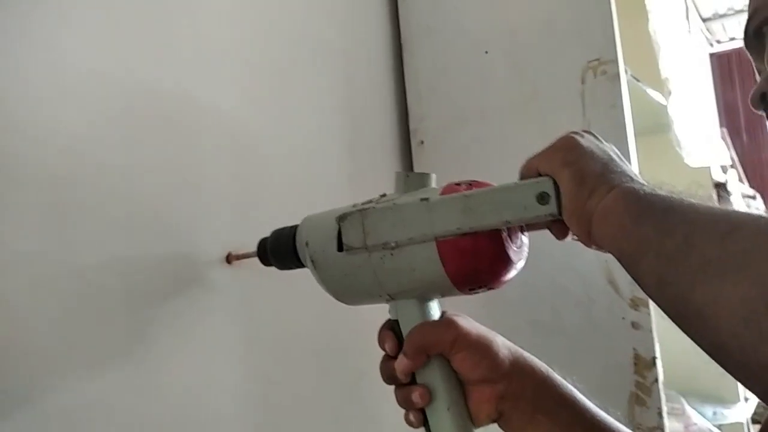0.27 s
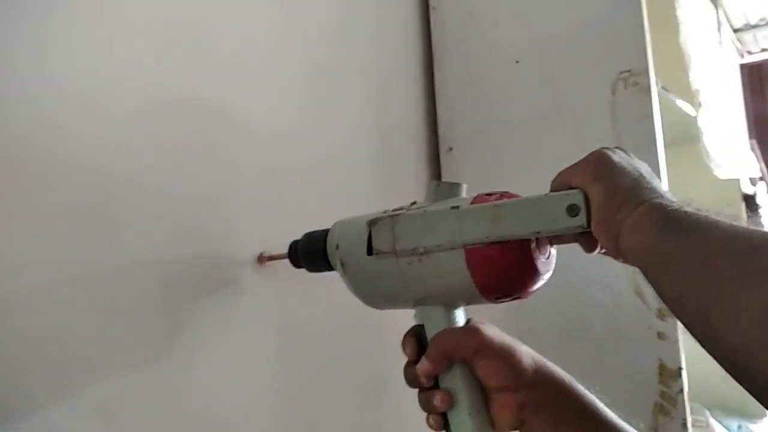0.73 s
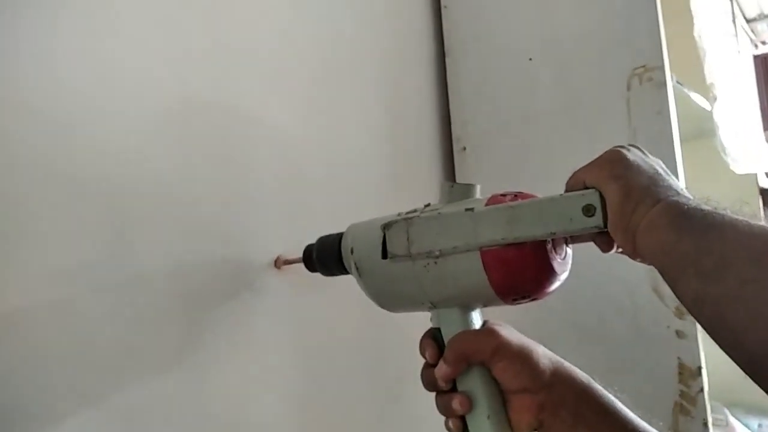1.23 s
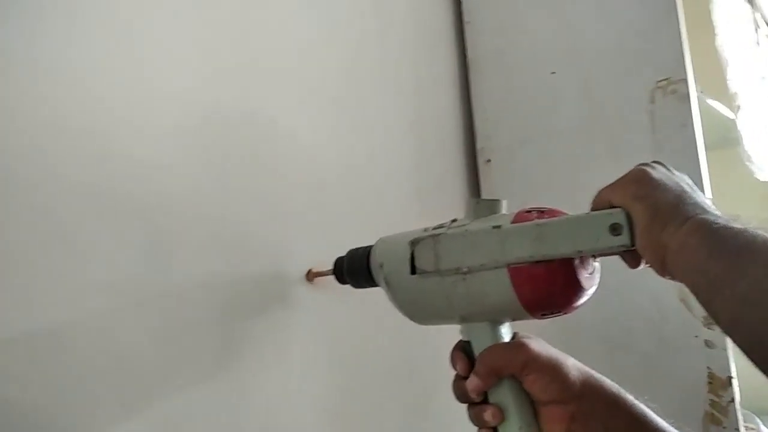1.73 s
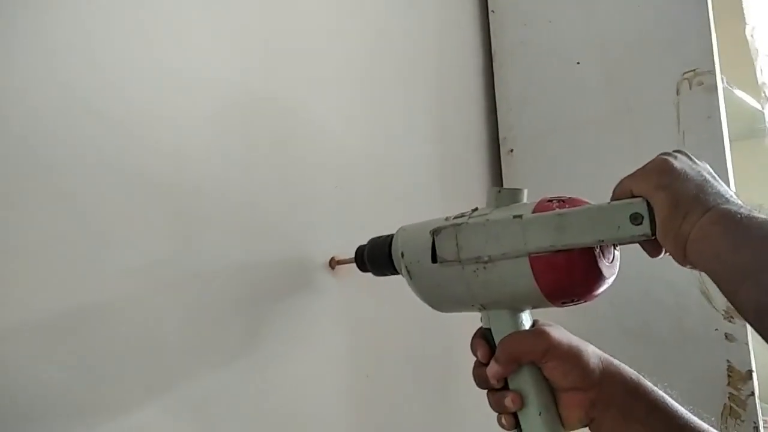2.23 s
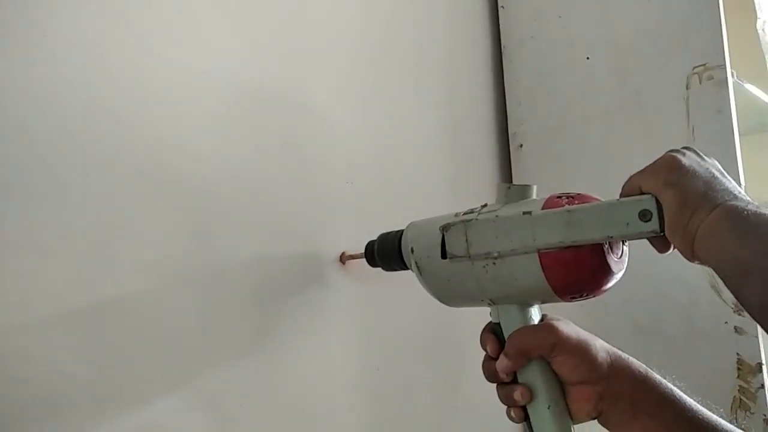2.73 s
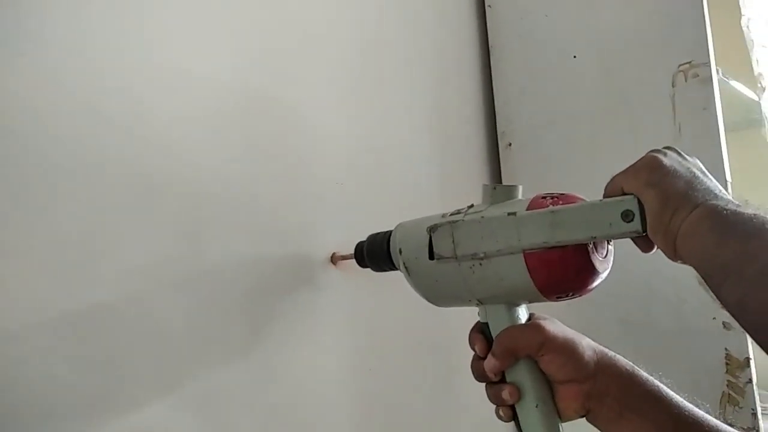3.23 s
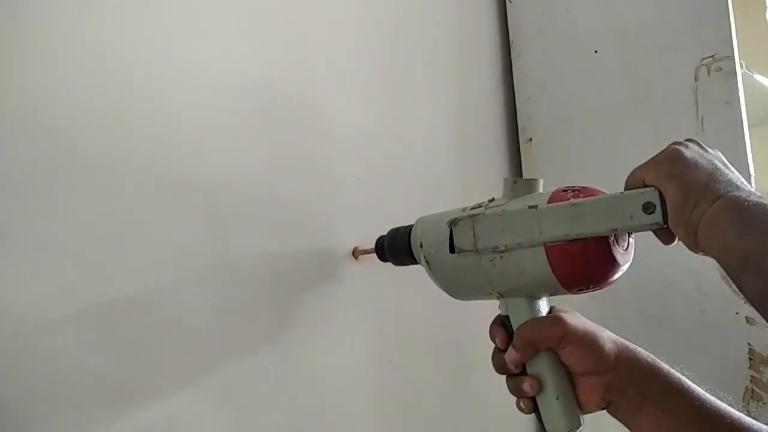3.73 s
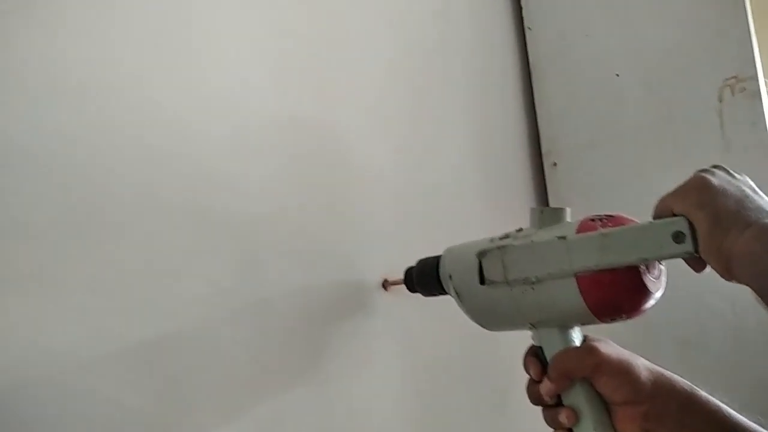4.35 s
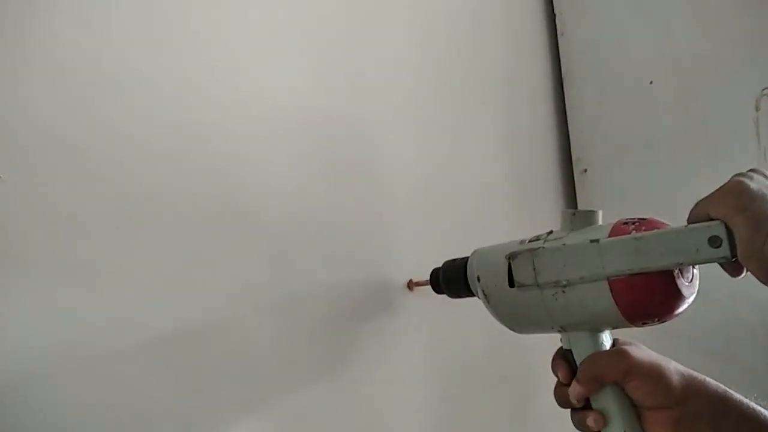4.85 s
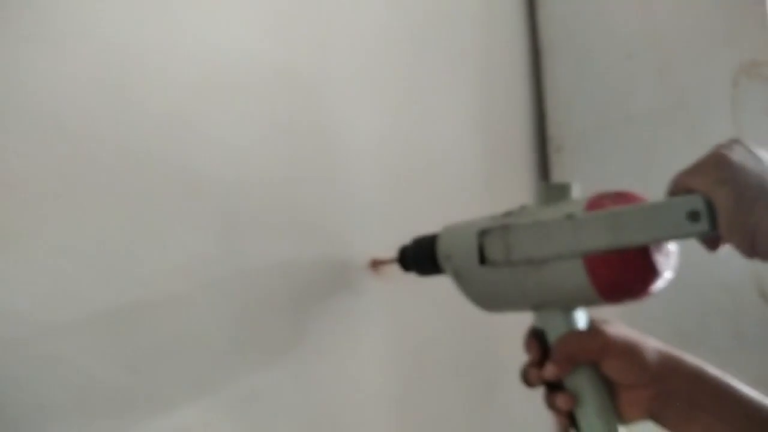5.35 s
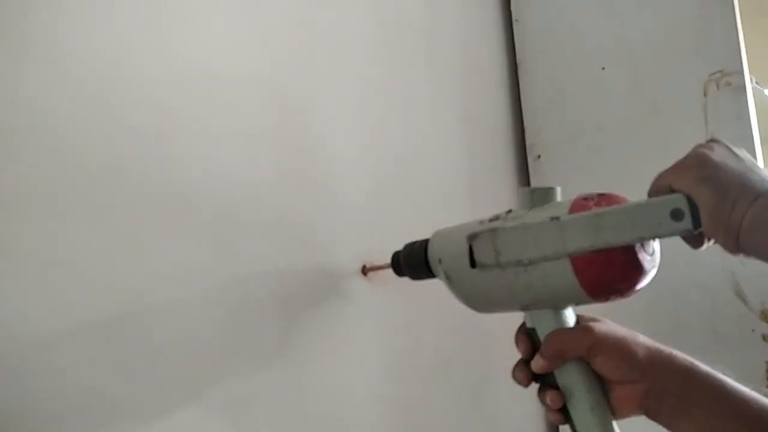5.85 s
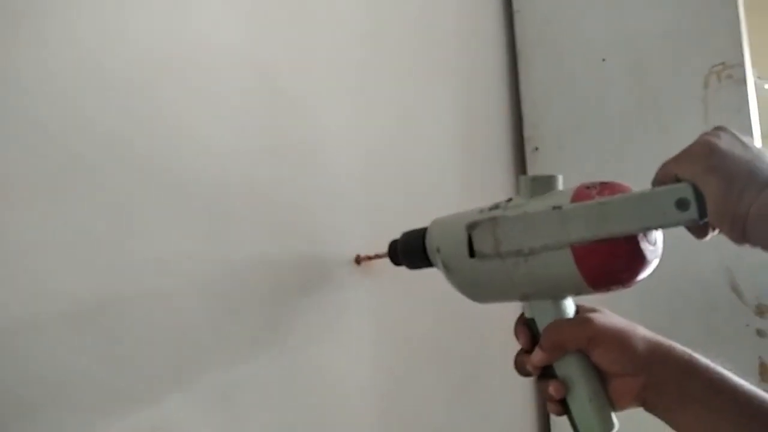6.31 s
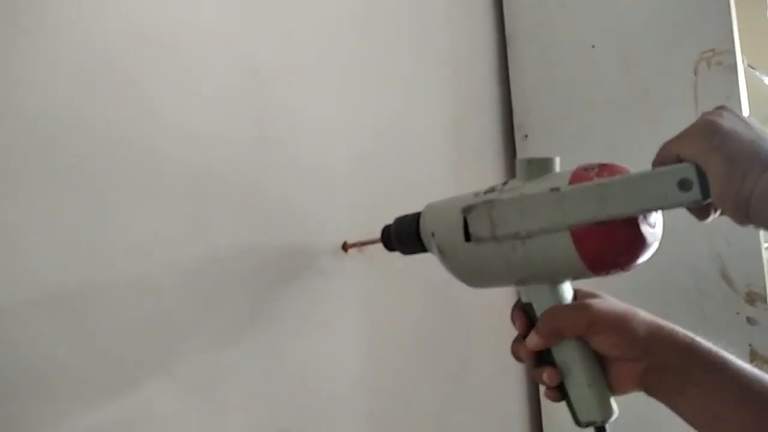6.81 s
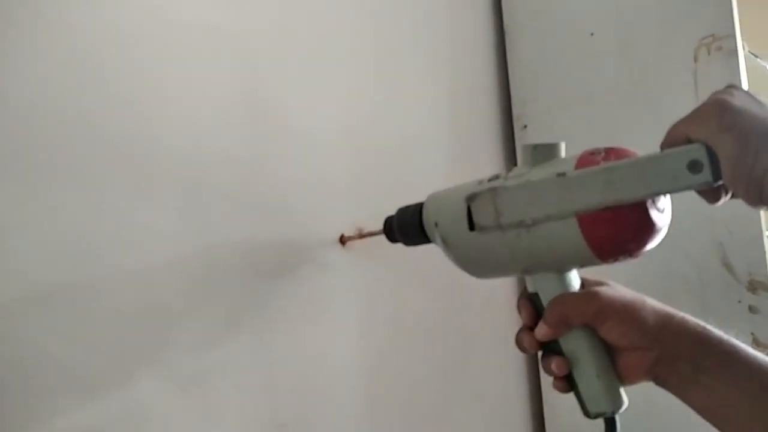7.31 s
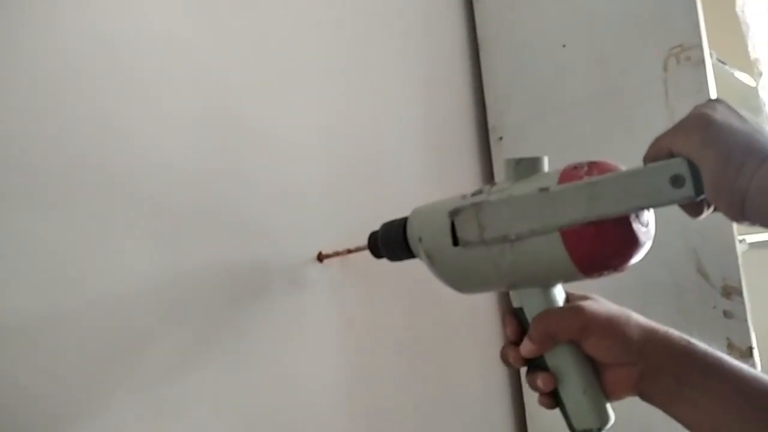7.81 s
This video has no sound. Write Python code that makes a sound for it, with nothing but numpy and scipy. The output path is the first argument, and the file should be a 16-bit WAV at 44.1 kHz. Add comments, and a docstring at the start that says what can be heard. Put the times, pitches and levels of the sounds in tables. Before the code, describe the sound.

A corded electric drill bores into a masonry wall, close to the microphone in a bare room. Its motor and gears whine steadily over a rush of air, while the bit gives rapid, high squeaks and a few soft low thumps sound on the left. After about five seconds the motor winds down, picks up briefly, and sinks again as the bit breaks into a shrill, wavering squeal.

```python
"""A corded drill bores into a masonry wall indoors, close to a two-port microphone. Motor and gears
whine through the housing; the trigger is let go at 5 s, so the rotor coasts down, and pulsed once more.
The bit sticks and slips on the stone: it squeaks about once a turn and squeals as it slows.
Low thumps reach mainly the left port, and the bare room answers."""
import sys
import numpy as np
from scipy import signal
from scipy.fft import rfft, irfft, next_fast_len
from scipy.io import wavfile
from scipy.ndimage import uniform_filter1d, map_coordinates

SR = 44100
rng = np.random.default_rng(int(sys.argv[2]) if len(sys.argv) > 2 else 0)


def master_out(mix):
    """Clip the mix to full scale and print it as 16-bit PCM to the path in sys.argv[1]."""
    frames = np.transpose(np.atleast_2d(mix))
    ceiling = np.clip(frames, -1, 1)
    pcm = np.round(ceiling * 32767).astype(np.int16)
    wavfile.write(sys.argv[1], SR, pcm)


N = 356151

# Rotor speed: t/s, f/Hz (turns a second)
ROTOR_SPEED = [(0, 326.5), (.35, 327.8), (1.2, 323.2), (1.6, 323), (2.3, 324.2), (3.35, 320), (3.8, 320.5),
               (5.03, 326), (5.34, 295), (5.8, 254.5), (6.27, 219.7), (6.78, 177), (6.86, 208), (6.95, 232),
               (7.2, 216), (7.66, 188), (8.08, 166)]
# Band faders of the motor: t/s, then level/dB of hum, drone, gears, hiss, top
MOTOR_BANDS = [(0, -43, -29.5, -15, -15.5, -30.5), (1.2, -43, -31, -16, -16.5, -32.5),
               (2.4, -43.5, -31, -17.5, -17, -32.5), (3.6, -44, -31, -16.5, -17.5, -34),
               (5, -44.5, -31, -16, -17, -32), (6.05, -44.5, -30, -16.5, -16, -31),
               (6.6, -49, -34, -20, -20, -31), (7.2, -46, -31.5, -17, -17.5, -33.5),
               (8.08, -47, -30.5, -21, -17.5, -29.5)]
GEAR_RATIO, CHUCK_RATIO = 5, 20  # rotor turns per turn of the gear shaft, of the chuck
def motor():
    """Air and gear noise throbs with the three shafts and sounds, with their tones, through the housing."""
    speed, = curves(ROTOR_SPEED)
    angle = 2 * np.pi * np.cumsum(speed) / SR
    throb = 1 + .076 * np.cos(angle) + .061 * np.cos(angle / GEAR_RATIO)
    throb += .062 * np.cos(angle / CHUCK_RATIO)
    source = throb * motor_rush() + motor_whine(speed, angle)
    out, edges_hz = 0, [0, 620, 1750, 5000, 11000, SR]
    for db, lo, hi in zip(curves(MOTOR_BANDS), edges_hz, edges_hz[1:]):
        band = filtered(source, lambda hz: housing(hz) * (hz >= lo) * (hz < hi))
        out += amp(db + .6 * wobble(9)) * unit(band)
    return out


# Gear tones: harmonic number of the gear shaft
GEAR_HARMONICS = [15, 34, 45, 51, 55, 56, 60, 61, 65, 83, 84, 85, 90, 94, 95, 115, 120, 144]
# Their balance at full load: level/dB
GEAR_LEVELS = [-20.5, -41, -25, -26, -40, -23.5, -26, -24, -26.5, -32, -22.5, -21, -23.5, -48, -20, -42,
               -24, -35]
# How hard the drill works: t/s, gear load/0-1, fan whine level/dB
LOAD_AND_FAN = [(0, 0.78, -20.5), (.75, 0.7, -15.5), (1.3, 0.76, -23), (3.35, 0.58, -22.5), (4.1, 0.6, -21),
                (5.03, 0.5, -28), (5.25, 0, -19.5), (5.5, 0.3, -18), (5.95, 0, -18.5), (6.3, 0.25, -27),
                (7.05, 0.35, -22), (8.08, 0.03, -33)]
def motor_whine(speed, angle):
    """Rotor, fan and gear teeth sing at harmonics of the gear shaft; the gear tones follow the load."""
    load, fan_db = curves(LOAD_AND_FAN)
    pace = speed / speed[0]
    spin_up = np.clip(uniform_filter1d(np.gradient(speed) * SR, size=3000) / 300, 0, 1)
    tones = [(5, amp(-15) * pace ** .66),  # rotor unbalance
             (50, amp(fan_db + 2.6 * wobble(6))),  # ten fan blades
             *[(harmonic, amp(db) * load) for harmonic, db in zip(GEAR_HARMONICS, GEAR_LEVELS)],
             (60, amp(-4 + 5.4 * wobble(250)) * spin_up * pace ** 3),  # twelve armature slots howl
             (90, amp(-17.5) * (1 - load) * (1 - speed / speed.max()))]  # shows as the rotor slows
    out = np.zeros((2, N))
    for harmonic, strength in tones:
        shared_phase = harmonic * angle / GEAR_RATIO + rng.uniform(0, 2 * np.pi) + .3 * wobble(20)
        for port in out:
            phase = shared_phase + .7 * wobble(1.5)
            port += np.sqrt(2) * strength * amp(1.5 * wobble(8)) * np.sin(phase)
    return out


# Focus of the rush: f/Hz, direct gain/0-1
DIRECT_SHARE = [(300, 0.54), (700, 0.85), (1500, 0.42), (3000, 0.62), (12000, 0.37)]
def motor_rush():
    """Air and gear noise arrives partly direct, partly as a diffuse wash."""
    near, far = patchy_noise(depth_db=2)[0], patchy_noise(depth_db=4)
    pair = np.array([near, np.roll(near, shift=4)])  # the left port is a little nearer
    direct = filtered(pair, lambda hz: along(DIRECT_SHARE, hz))
    wash = .71 * unit(room(near)) + .77 * far
    diffuse = filtered(wash, lambda hz: np.sqrt(1 - along(DIRECT_SHARE, hz) ** 2))
    return unit(direct + diffuse)


# Housing resonances: f/Hz, width/Hz, left level/dB, right level/dB
HOUSING_PEAKS = [(812, 140, 3.5, 5), (1480, 200, 7.5, 1.5), (2480, 58, 1.5, 3), (2760, 440, -2, -2.5),
                 (3340, 1040, 3, 2), (4617, 116, 7.5, 7), (5840, 220, 2.5, 4), (7530, 150, 7, 3.5),
                 (7910, 180, 5, -2)]
# Broad EQ of housing and microphone: f/Hz, left level/dB, right level/dB
PORT_EQ = [(60, -46, -37), (353, -23.5, -30.5), (760, -15, -10), (1645, -14, -9.5), (2127, -2, -3),
           (4616, -2, -1), (5020, -6.5, -16.5), (5620, -1.5, -8), (7530, -1, -1.5), (9520, -7, -8),
           (10700, -5.5, -14), (10850, -12, -10), (11840, 1.5, -1), (14240, -3, -5.5), (14400, -52, -54)]
def housing(hz):
    """Gain at both ports: the housing's resonances ride on broad slopes."""
    peaks = sum(np.array([[left_db], [right_db]]) / (1 + (2 * (hz - centre) / width) ** 2)
                for centre, width, left_db, right_db in HOUSING_PEAKS)
    slopes = np.array([along(np.array(PORT_EQ)[:, [0, side]], hz) for side in (1, 2)])
    return amp(slopes + peaks)


def bit_friction():
    """The bit sticks and slips on the stone; squeaks and squeal share a fast shake in pitch and level."""
    tremor_hz = 110 * wobble(700)
    flutter_db = np.clip(2 * wobble(300), -5, 3)
    return squeaks(tremor_hz, flutter_db) + squeal(tremor_hz, flutter_db)


def squeaks(tremor_hz, flutter_db):
    """Short chirps whose pitch bends as the tip binds and frees within a turn."""
    out, fade_s = np.zeros(N), .003
    for s, length, first_hz, middle_hz, last_hz, db in [*main_squeaks(), *faint_squeaks()]:
        u = np.linspace(0, 1, round((length + fade_s) * SR))
        start = round((s - fade_s / 2) * SR)
        here = slice(start, start + len(u))
        hz = first_hz * (1 - u) * (1 - 2 * u) + 4 * middle_hz * u * (1 - u) + last_hz * u * (2 * u - 1)
        phase = 2 * np.pi * np.cumsum(hz + tremor_hz[here]) / SR
        tone = np.sin(phase) + amp(-39) * np.sin(2 * phase)
        swell = np.clip(np.minimum(u, 1 - u) * length / fade_s, 0, 1)
        out[here] += amp(db + 3 + flutter_db[here]) * swell * tone
    return out


# Squeak cues, mostly one a chuck turn: t/s, f/Hz, level/dB
SQUEAK_CUES = [(.403, 6850, -21), (0.497, 6720, -17.5), (.568, 6800, -25), (.62, 6830, -19),
               (.686, 6980, -19), (.743, 7100, -18), (.87, 6720, -22), (.931, 6720, -16.5),
               (1.0, 7080, -17.5), (1.263, 7850, -21), (1.359, 6800, -17), (1.423, 6880, -15),
               (1.457, 8110, -20.5), (1.547, 6990, -19.5), (1.603, 6830, -17), (1.662, 6800, -16),
               (1.725, 6800, -18), (1.8, 7230, -22), (1.862, 7490, -21), (2.102, 6800, -21),
               (2.196, 8750, -24), (2.255, 8300, -22), (2.305, 7750, -19), (2.36, 7500, -19),
               (2.379, 8000, -17), (2.423, 7520, -16.5), (2.482, 7700, -15), (2.561, 8180, -16),
               (2.603, 7800, -16), (2.663, 7940, -12), (2.728, 8030, -14), (2.791, 7900, -13.5),
               (2.821, 8550, -19), (2.879, 8670, -21), (2.918, 7930, -14), (2.981, 7960, -13),
               (3.048, 7900, -14), (3.106, 7920, -14), (3.17, 7840, -14.5), (3.236, 8220, -15.5),
               (3.294, 7880, -15.5), (3.356, 7830, -16), (3.419, 7760, -14), (3.48, 7770, -13),
               (3.548, 7570, -13.5), (3.613, 7620, -14.5), (3.673, 7750, -15.5), (3.733, 7680, -12.5),
               (3.802, 7800, -18.5), (3.869, 7760, -18), (3.93, 7390, -21), (3.993, 7440, -18.5),
               (4.049, 7400, -17.5), (4.108, 7560, -17), (4.172, 7700, -15), (4.238, 7670, -17),
               (4.297, 7250, -16.5), (4.42, 7470, -18), (4.484, 7430, -18), (4.612, 7350, -19.5),
               (4.659, 4530, -16), (4.679, 4670, -17.5), (4.735, 7130, -17.5), (4.796, 7400, -14.5),
               (4.859, 7820, -16), (4.923, 7570, -15), (5.063, 4400, -21), (5.092, 4400, -18),
               (5.16, 4300, -18), (5.251, 4450, -20), (5.316, 4450, -18), (5.365, 8200, -21),
               (5.405, 4480, -21), (5.47, 4930, -19), (5.935, 4540, -21), (5.957, 4500, -20),
               (6.012, 4500, -23), (6.1, 4500, -21), (6.12, 3860, -20.5), (6.187, 4620, -24),
               (6.204, 4330, -23)]
# Squeak shape as the hole deepens: t/s, length/s, glide/Hz, sag in the middle/Hz
SQUEAK_SHAPE = [(0.505, 0.028, 150, 52), (1.4, 0.013, 0, 0), (1.7, 0.027, 450, 0), (2.295, 0.024, 379, 80),
                (2.695, 0.03, -200, 323), (2.903, 0.019, -600, 50), (3.6, 0.018, -500, 0),
                (4.202, 0.0226, -350, 32), (4.65, 0.017, 0, 0), (4.9, 0.012, -350, 80),
                (5.3, 0.013, 205, 0), (5.403, .025, -800, 0), (5.47, .018, 400, -3), (5.947, 0.016, 0, 0),
                (6.094, .022, -600, 0), (6.197, .02, 300, 0)]
def main_squeaks():
    """Each squeak takes its length and bend from the state of the tip at that moment."""
    s, hz, db = np.transpose(SQUEAK_CUES)
    when, *columns = np.transpose(SQUEAK_SHAPE)
    length, glide, sag = [np.interp(s, when, column) for column in columns]
    scatter_hz = 122 * rng.standard_normal((len(s), 2))
    first_hz = hz + sag - glide / 2 + scatter_hz[:, 0]
    last_hz = hz + sag + glide / 2 + scatter_hz[:, 1]
    return zip(s, length, first_hz, hz, last_hz, db)


# Runs of faint squeaks: start t/s, end t/s, squeak length/s, first, middle and last f/Hz, level/dB
SQUEAK_RUNS = [(0.875, .96, 0.023, 3440, 3580, 3760, -21), (1.308, 1.5, 0.015, 3390, 3594, 3690, -19),
               (1.758, 2.03, 0.013, 8560, 8580, 8800, -20.5), (5.312, 5.46, 0.022, 7660, 8340, 8450, -25),
               (5.538, 5.86, 0.017, 9740, 9600, 9400, -22.5), (6.1, 6.22, 0.018, 9500, 9260, 8750, -28)]
def faint_squeaks():
    """Within a run the bit squeaks once per chuck turn, each time a little differently."""
    turns = np.cumsum(curves(ROTOR_SPEED)[0]) / CHUCK_RATIO / SR
    t = np.arange(N) / SR
    for start, end, length, *hz, db in SQUEAK_RUNS:
        spread = np.ptp(hz) / np.mean(hz) / 3 + .005  # wide glides vary the most
        first, last = np.interp([start, end], t, turns)
        for s in np.interp(np.arange(first, last), turns, t):
            pitches = np.array(hz) * (1 + spread * rng.standard_normal(3))
            yield s, length, *pitches, db + 1.5 * rng.standard_normal()


# Long squeal of the slowing bit: t/s, f/Hz, level/dB
SQUEAL_LINE = [(5.55, 6000, -47), (5.575, 6200, -22.5), (5.9, 6180, -25), (5.93, 6200, -45),
               (6.24, 5900, -45), (6.28, 5600, -20), (6.31, 5840, -27), (6.33, 6950, -23),
               (6.36, 6450, -23), (6.41, 6340, -22), (6.43, 6780, -21), (6.53, 7030, -17.5),
               (6.62, 7100, -10), (6.65, 6780, -19), (6.68, 6970, -17.5), (6.74, 6350, -23.5),
               (6.78, 6800, -15), (6.83, 6040, -17.5), (6.89, 6300, -21), (7.0, 6020, -16.5),
               (7.13, 6160, -16.5), (7.26, 6550, -18), (7.35, 6400, -18), (7.45, 6320, -18.5),
               (7.5, 5930, -17), (7.545, 6320, -16), (7.575, 5970, -47)]
# A cutting edge catches, about twice a chuck turn: t/s, pitch drop/Hz, level drop/dB
EDGE_CATCHES = [(5.565, 1700, 0), (5.612, 0, 15), (5.638, 1500.5, 3), (5.69, 1, 15), (5.715, 701, -1),
                (5.808, 1699, 3), (5.88, 1898, 2), (6.315, -2, 12), (6.415, -1, 4), (6.5, 506, 5),
                (6.555, 200, 26), (6.599, 300, 24), (6.642, 302, 9), (6.702, 1187, 4), (6.762, 300, 6),
                (6.805, 795, 10), (6.9, 693, -1), (6.945, 1008, 9), (6.99, 1102, 5), (7.022, 1400, 10),
                (7.077, 554, 2), (7.105, 1610, 19), (7.152, 498, 4), (7.195, 898, 15), (7.237, 798, 1),
                (7.285, 996, 20), (7.33, 1038, -1), (7.38, 1340, 11), (7.422, 1105, 15), (7.478, 1210, 22),
                (7.52, 806, 18)]
def squeal(tremor_hz, flutter_db):
    """An unbroken stick-slip tone that sinks and ducks where an edge catches."""
    t = np.arange(N) / SR
    hz, db = curves(SQUEAL_LINE)
    for s, drop_hz, drop_db in EDGE_CATCHES:
        dip = np.clip(1 - abs(t - s) / .018, 0, 1) ** .93  # 18 ms down, 18 ms back
        hz, db = hz - drop_hz * dip, db - drop_db * dip
    phase = 2 * np.pi * np.cumsum(hz + tremor_hz) / SR
    tone = np.sin(phase) + amp(-22) * np.sin(2 * phase)
    gate = (t > SQUEAL_LINE[0][0]) & (t < SQUEAL_LINE[-1][0])
    return gate * amp(db + 1.5 + 2 * wobble(40) + flutter_db) * tone


# Pan of the direct bit sound: t/s, left minus right level/dB
BIT_PAN = [(6.4, 1.5), (6.8, 9)]
def bit_in_room(friction):
    """The bit is heard direct, leaning left, and back from the walls."""
    pan_db, = curves(BIT_PAN)
    return friction * amp([pan_db / 2, -pan_db / 2]) + amp(-3) * room(friction)


# Thump cues: t/s, level/dB
THUMP_CUES = [(1.86, -28), (2.364, -24), (2.675, -13), (2.797, -19), (3.176, -25), (3.48, -13),
              (4.045, -16), (4.799, -18.5), (6.46, -17), (6.571, -15), (6.659, -19)]
# Low flutter: t/s, bed level/dB, level/dB of the part that follows the bit
RUMBLE_LEVELS = [(0, -35, -15), (2.1, -36, -19), (2.5, -35, -11), (4.8, -36, -12.5), (5.3, -39, -25),
                 (6.5, -51, -21), (7.4, -54, -15.5), (7.7, -45, -18)]
# EQ of flutter and thumps: f/Hz, level/dB
RUMBLE_EQ = [(20, -35), (60, -12.5), (120, -5), (350, -1.5), (700, -10), (1100, -12)]
def thumps(friction):
    """Low noise swells whenever the bit binds and jolts at each cue, nearly all at the left port."""
    bed_db, bind_db = curves(RUMBLE_LEVELS)
    binding = np.sqrt(abs(uniform_filter1d(friction ** 2, size=400)))
    gain = amp(bed_db + 5.7 * wobble(30)) + amp(bind_db + 2.2 * wobble(40)) * binding
    t = np.arange(N) / SR
    for s, db in THUMP_CUES:
        u = np.clip(t - s, 0, None) / .0085  # peaks after 8.5 ms
        gain += amp(db - 6) * u ** 2 * np.exp(2 - 2 * u)
    rumble = filtered(rng.standard_normal((2, N)), lambda hz: amp(along(RUMBLE_EQ, hz)))
    return gain * unit(rumble) * amp([[0], [-17]])


# Reverb of the bare room: f/Hz, 60 dB decay time/s
ROOM_DECAY = [(300, 0.7), (3000, 0.51), (10000, 0.55)]
def room(x):
    """Each port hears its own tail; each frequency dies at its own speed."""
    hz, t, spectrum = signal.stft(rng.standard_normal((2, SR // 2)), SR, nperseg=256)
    decay = amp(-60 * t / along(ROOM_DECAY, hz)[:, None])
    tail = signal.istft(spectrum * decay, SR, nperseg=256)[1]
    delayed = np.pad(x, (200, 0))[None]
    return signal.fftconvolve(delayed, tail / np.linalg.norm(tail[0]), axes=1)[:, :N]


def patchy_noise(depth_db):
    """Two noises that share patches of random gain in time and frequency."""
    spectrum = signal.stft(rng.standard_normal((2, N)), nperseg=512)[2]
    patches = uniform_filter1d(rng.standard_normal(spectrum.shape[1:]), size=3, axis=0)
    patches = uniform_filter1d(patches, size=8, axis=1)
    return unit(signal.istft(spectrum * amp(depth_db * unit(patches)), nperseg=512)[1][:, :N])


def amp(db):
    """Decibels to gain."""
    return 10 ** (np.asarray(db) / 20)


def unit(x):
    """x at rms 1."""
    return x / np.sqrt(np.mean(x ** 2) + 1e-20)


def along(points, hz):
    """Read (f/Hz, value) points on a log frequency axis."""
    f, values = np.transpose(points)
    return np.interp(np.log(hz + 1), np.log(f + 1), values)


def curves(rows):
    """One value per sample for each column after the time."""
    s, *columns = np.transpose(rows)
    return [np.interp(np.arange(N) / SR, s, column) for column in columns]


def wobble(rate):
    """A random curve, rate knots a second."""
    knots = rng.standard_normal(int(N * rate / SR) + 4)
    return map_coordinates(knots, [np.arange(N) * rate / SR], order=1)


def filtered(x, response):
    """x shaped by a gain that depends on frequency."""
    size = next_fast_len(N + 8192)
    return irfft(rfft(x, size) * response(np.fft.rfftfreq(size, 1 / SR)), size)[..., :N]


def scene():
    """The drill, its bit and the low jolts."""
    friction = bit_friction()
    return motor() + bit_in_room(friction) + thumps(friction)


def record(dry):
    """Peaks are rounded off and the top is cut at 14.5 kHz."""
    soft = dry / (1 + abs(dry / .9) ** 4) ** (1 / 4)
    return filtered(soft, lambda hz: hz < 14500)


dry = scene()
out = record(dry)
master_out(out)
```